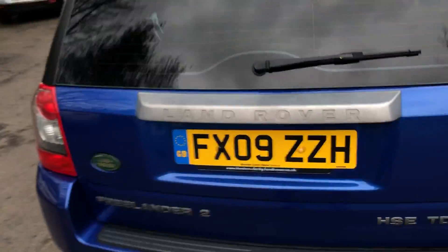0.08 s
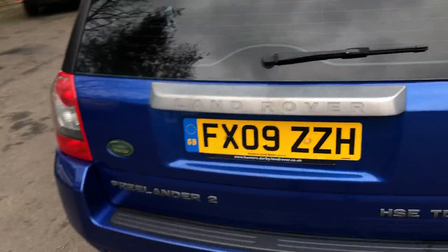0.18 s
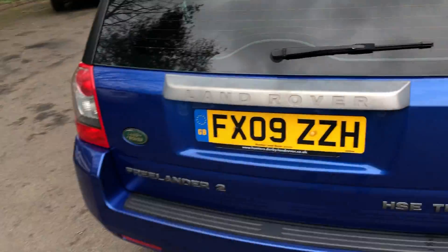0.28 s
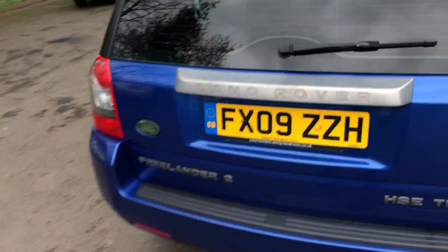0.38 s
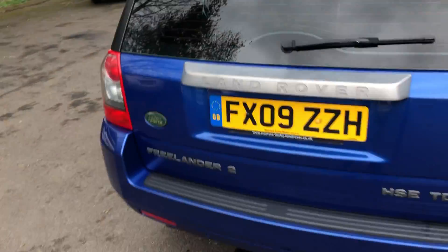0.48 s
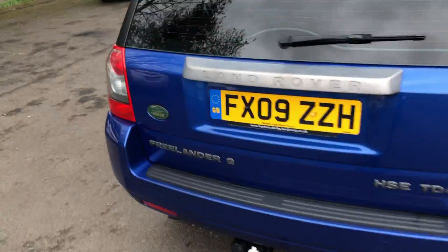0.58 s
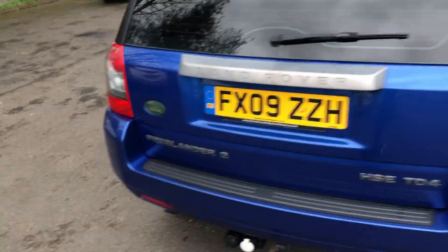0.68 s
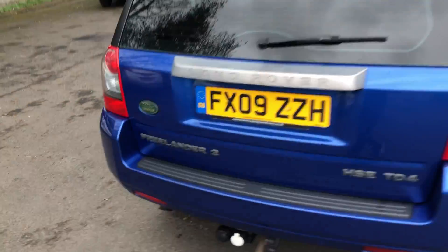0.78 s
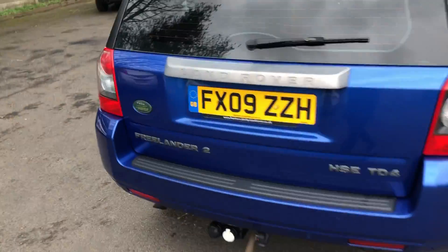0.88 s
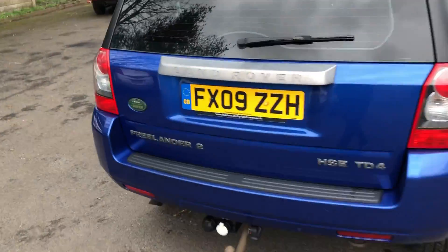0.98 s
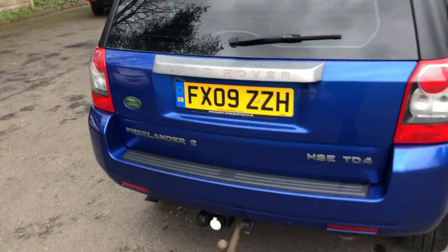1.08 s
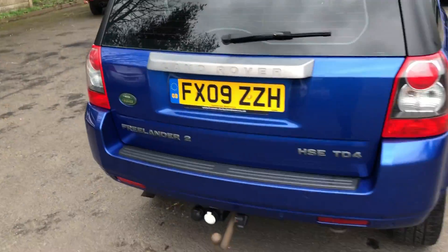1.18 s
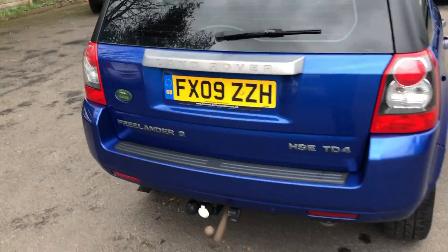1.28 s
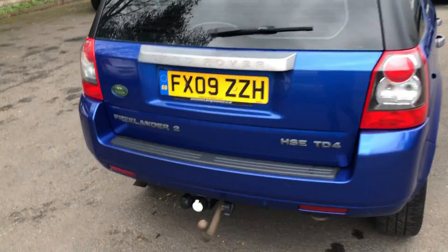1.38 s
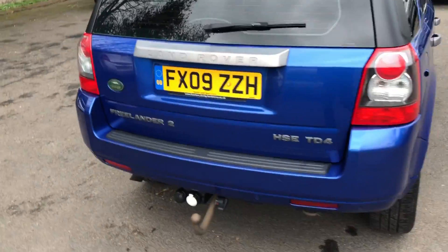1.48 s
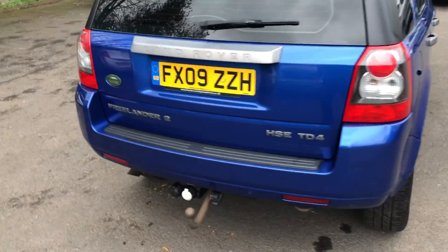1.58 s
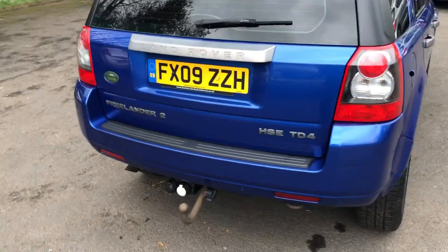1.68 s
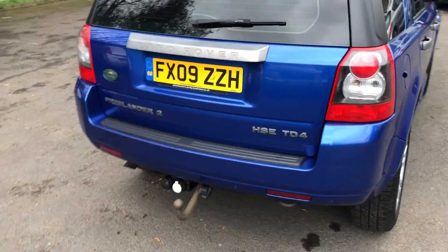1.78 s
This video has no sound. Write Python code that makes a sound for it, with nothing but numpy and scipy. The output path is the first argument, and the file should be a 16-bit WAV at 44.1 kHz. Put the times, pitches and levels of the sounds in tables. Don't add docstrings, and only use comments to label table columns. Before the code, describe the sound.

A car door slams shut with one sharp metallic clunk over a low distant traffic roar

```python
import sys
import numpy as np
from scipy import signal
from scipy.fft import rfft, irfft
from scipy.io import wavfile
from scipy.ndimage import uniform_filter1d

SR = 44100
rng = np.random.default_rng(int(sys.argv[2]) if len(sys.argv) > 2 else 0)


def output_pcm(signal):
    pcm = np.clip(np.atleast_2d(signal).T, -1, 1) * 32767
    wavfile.write(sys.argv[1], SR, np.round(pcm).astype(np.int16))


def elevation(decibels):
    levels = np.asarray(decibels, float)
    return 10 ** (levels / 20)


N = 79380


def evened(x):
    return x / np.sqrt(np.mean(x ** 2) + 1e-20)


def read(points, hz):
    f, value = np.transpose(points)
    return np.interp(np.log(hz + 1), np.log(f + 1), value)


def burst(start_s, length_s, rise_s, release_s):
    t = np.arange(N) / SR - start_s
    return np.clip(t / rise_s, 0, 1) * np.exp(-np.maximum(t - length_s, 0) / release_s)


def ring(modes):
    t = np.arange(SR // 2) / SR
    return sum(elevation(db - 60 * t / t60) * np.sin(2 * np.pi * hz * t) for hz, db, t60 in modes)


def colour(points):
    log_gain = np.log(elevation(read(points, abs(np.fft.fftfreq(2048, 1 / SR)))))
    return np.fft.ifft(np.exp(np.conj(signal.hilbert(log_gain)))).real[:1024]


def through(x, taps):
    return signal.fftconvolve(x, taps / np.linalg.norm(taps))[:N]


# f/Hz, level/dB per Hz
TRAFFIC_SPECTRUM = [(12, -54), (20, -16.5), (48, -0.5), (187, -5.5), (228, 0.5), (410, -11.5), (949, -8.5),
                    (1860, -18.5), (16000, -49)]
# f/Hz, width/Hz, level/dB
TYRE_HUMPS = [(940.5, 195.46, 3), (230, 255.7, 1.5), (121.05, 30.83, 5.5), (53.802, 13.75, 7.5),
              (3456, 619.2, 0.5), (13090, 776, -0.5)]
# t/s, level/dB
ROAR_LEVEL = [(0.0, -40.5), (0.124, -40.5), (0.28, -40.5), (0.746, -39.5), (1.8, -37.5)]
# t/s, slope/dB per octave above 1.5 kHz
ROAR_SHINE = [(0, .5), (.5, 0), (.9, 0.1013), (1.3, -1), (1.55, -0.8535), (1.8, 1.0793)]


def traffic():
    size, hop = 1024, 256
    frames, hz = N // hop + 5, np.fft.rfftfreq(size, 1 / SR)
    real, imag, patches = rng.standard_normal((frames, size // 2 + 1, 3)).T
    patches = uniform_filter1d(patches, size=10, axis=0)
    patches = evened(uniform_filter1d(patches, size=10, axis=1))
    patch_db = np.interp(hz, [150, 600], [0.3, 0.7])[:, None]

    humps_db = sum(db * np.exp(-((hz - f) / width) ** 2) for f, width, db in TYRE_HUMPS)
    shape_db = read(TRAFFIC_SPECTRUM, hz) + humps_db
    octaves = np.log2(np.maximum(hz / 1500, 1))
    slope = np.interp(np.arange(frames) * hop / SR, *np.transpose(ROAR_SHINE))
    gain_db = shape_db[:, None] + patch_db * patches + np.outer(octaves, slope)

    spectrum = (real + 1j * imag) * elevation(gain_db)
    roar = signal.istft(spectrum, nperseg=size, noverlap=size - hop)[1][:N]
    level_db = np.interp(np.arange(N) / SR, *np.transpose(ROAR_LEVEL))
    return elevation(level_db + 0.6188) * evened(roar)


# t/s, length/s, level/dB, centre f/Hz, width/Hz
SCUFFS = [(0.188, 0.00403, -60.5, 9000, 6000), (0.36, 0.0033, -53.5, 4964, 2000),
          (.437, 0.001295, -54, 7000, 5000), (0.453, 0.00407, -59.5, 5997, 2973),
          (.572, 0.002333, -61.5, 7976, 5995), (0.8517, 0.001965, -54.5, 5890, 2000),
          (0.852, 0.00201, -64, 9500, 5000), (1.009, 0.00605, -69.5, 14000, 7000),
          (1.037, 0.01208, -70, 14000, 6000), (1.052, 0.00296, -61.5, 11000, 9000),
          (1.65, 0.00807, -66, 14990, 4000), (1.662, 0.002033, -59, 10500, 7000)]


def scuffs():
    hz, out = np.fft.rfftfreq(N, 1 / SR), np.zeros(N)
    for s, length, db, centre_hz, width_hz in SCUFFS:
        band = 1 / (1 + ((hz - centre_hz) / width_hz * 2) ** 2)
        grit = irfft(rfft(rng.standard_normal(N)) * band, N)
        out += elevation(db) * evened(grit) * burst(s, length, rise_s=0.000609, release_s=0.003123)
    return out


# f/Hz, t60/s
YARD_T60 = [(100, 0.4788), (500, 0.33898), (3000, 0.23294), (12000, 0.15768)]


def yard(x):
    taps, at = np.zeros(SR), np.arange(400, SR - 20, 20)
    taps[at + rng.integers(0, 20, len(at))] = rng.choice([-1., 1.], len(at))
    hz, t, z = signal.stft(taps, SR, nperseg=256)
    decay = elevation(-60 * t / read(YARD_T60, hz)[:, None])
    return through(x, signal.istft(z * decay, SR, nperseg=256)[1])


# t/s, start f/Hz, end f/Hz, peak level/dB, length/s
THUMPS = [(.2165, 735.2, 654.3, -6.5, 0.010955), (.216, 223.2, 173.7, -8.5, 0.024101),
          (0.221, 139.9, 64.25, -8, 0.032566), (.254, 201.6, 246.6, -10, 0.034436),
          (0.224, 59.45, 42.37, -14, 0.04184), (0.271, 42.3, 69.91, -19, 0.04013),
          (.3, 186.3, 230, -24, 0.020115), (.328, 279.7, 257.7, -22, 0.03002),
          (.33, 61.96, 49.94, -33.5, 0.0536), (0.368, 271.3, 292.2, -27.5, 0.025125),
          (0.403, 60.8, 77.93, -30.5, 0.03236), (.425, 146.8, 133.1, -37, 0.02496),
          (0.447, 77.55, 69.86, -41, 0.031), (0.534, 91.23, 91.36, -34, 0.04384)]


def thumps():
    t, out = np.arange(N) / SR, np.zeros(N)
    for s, start_hz, end_hz, db, length in THUMPS:
        u = np.clip((t - s) / length, 0, 1)
        turns = length * u * (start_hz + (end_hz - start_hz) * u / 2)
        swell = np.sin(np.pi * u ** 0.8682) ** 2
        out += elevation(db) * swell * np.sin(2 * np.pi * turns)
    return out


# t/s, length/s, clatter level/dB, fizz level/dB, panel drive level/dB
CONTACTS = [(0.2118, 0.005254, -21, -34, -20), (0.2195, 0.005565, -16.5, -24, -18.5),
            (.229, 0.012594, -28.5, -39.5, -8), (0.2469, 0.015046, -22.5, -40.5, -20.5),
            (0.269, 0.012835, -31, -37.5, -18), (0.284, 0.015413, -46.5, -57, -25),
            (0.3, 0.014596, -36.5, -48.5, -22), (0.315, 0.02556, -55, -60.5, -33),
            (0.357, 0.021957, -48.5, -64, -46), (0.385, 0.03461, -56, -74.5, -48.5),
            (0.425, 0.01101, -52.5, -71.5, -50.5), (.449, 0.01007, -51.5, -73.5, -52.5),
            (0.464, 0.02734, -59, -75.5, -49.5)]
# f/Hz, level/dB per Hz
CLATTER = [(150, -10), (500, -14), (1500, -2), (3000, 0.5), (4500, -5.5), (6500, -9.5), (10000, -20),
           (16000, -17)]
# f/Hz, level/dB per Hz
FIZZ = [(2000, -15), (5500, -14), (8500, -4), (11000, 0), (13500, -4), (16000, -4)]
# f/Hz, level/dB, t60/s
PANEL = [(203.54, -1, 0.03303), (317.14, -5.5, 0.0915), (343.96, -6, 0.06147), (387.48, -0.5, 0.07064),
         (450.81, -1.5, 0.05761), (522.57, -4, 0.04396), (565.66, -3.5, 0.04785), (620.49, -7, 0.05683),
         (714.67, -1.5, 0.03896), (789.19, -13.5, 0.06164), (889.06, -13, 0.04342),
         (966.83, -12.5, 0.07585), (1045.1, -16.5, 0.03282), (1210, -43.5, .04)]


def chatter():
    clicks = rng.standard_normal((3, N))
    clicks *= elevation(2.8 * np.minimum(rng.exponential(1, (3, N)), 3.5))
    shapes = np.array([burst(s, length, rise_s=0.0012995, release_s=0.004285)
                       for s, length, *_ in CONTACTS])
    levels = elevation(np.array(CONTACTS)[:, 2:])
    clatter, fizz, drive = evened(clicks) * (levels.T @ shapes)
    return through(clatter, colour(CLATTER)) + through(fizz, colour(FIZZ)) + through(drive, ring(PANEL))


# t/s, level/dB
STRIKES = [
    (0.2128, -14.5),
    (0.2144, -5),
    (0.2191, -8.5),
    (0.2233, -14.5),
    (0.2492, -15.5),
    (.2535, -23),
    (.259, -21.5),
]
# f/Hz, level/dB, t60/s
LATCH = [(1649.7, -1, 0.02083), (1004.4, -5.5, 0.06338), (2668.6, -18, 0.0207), (2955.2, -12, 0.0305),
         (4515, -18, 0.02077), (7000, -16.5, 0.00965)]
# f/Hz, level/dB, t60/s
PIN = [(4200, -21, .014), (9290, -52, .22), (9400, -54, .2), (9740, -52, .18), (11250, -51, .22),
       (11430, -53, .25), (3480, -52, .5), (3590, -54, .4)]


def latch():
    out = np.zeros(N)
    blows = [(s, db, LATCH) for s, db in STRIKES] + [(0.2718, 0, PIN)]
    for s, db, modes in blows:
        out[round(s * SR):][:SR // 2] += elevation(db) * ring(modes)
    return out


def scene():
    clash, push = chatter() + latch(), thumps()
    echo = elevation(-13.5) * yard(clash + elevation(-4.5) * push)
    return (clash + push + echo + scuffs() + traffic())[None]


def band_limit(x):
    return signal.sosfilt(signal.butter(12, 16530, fs=SR, output="sos"), x)


def record(dry):
    bass_cut = signal.butter(4, 37.49, "high", fs=SR, output="sos")
    cut = signal.sosfilt(bass_cut, dry)
    soft = 0.88355 * np.tanh(cut / 0.90552)
    edge = signal.firwin(2047, 15770, window=("kaiser", 6), fs=SR)[None]
    return band_limit(signal.oaconvolve(soft, edge, "same"))


dry = scene()
out = record(dry)
output_pcm(out)
```